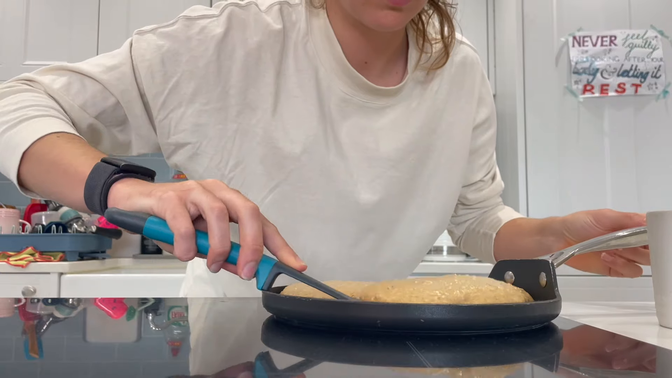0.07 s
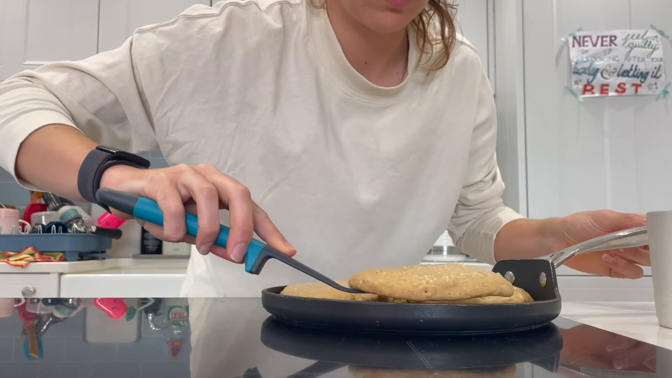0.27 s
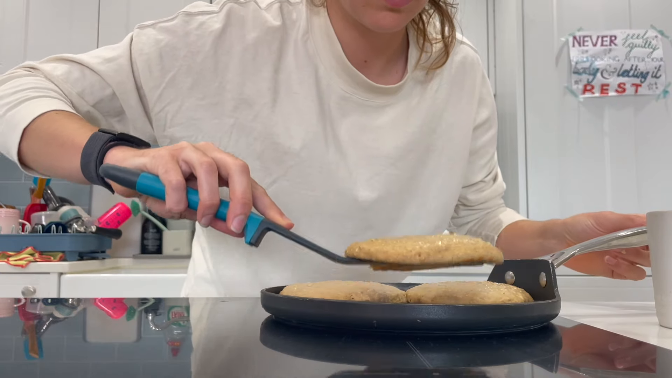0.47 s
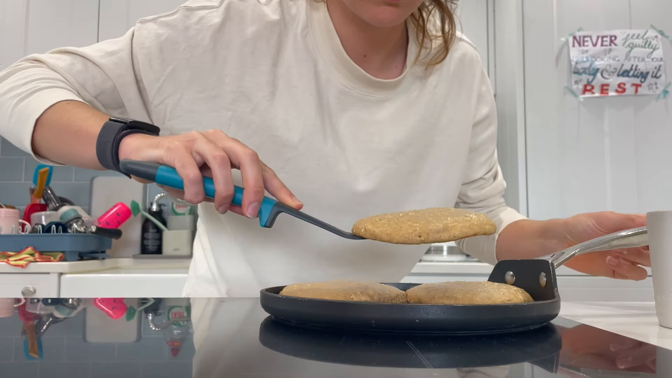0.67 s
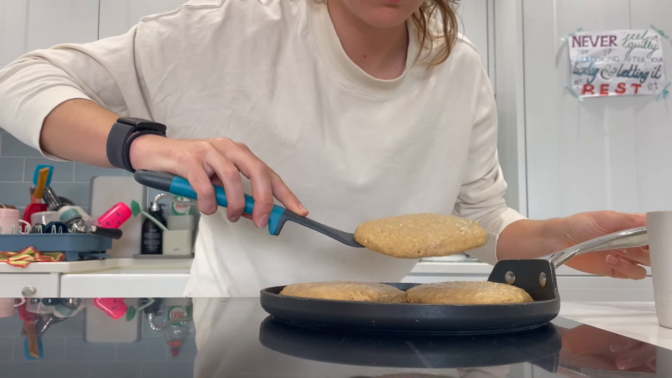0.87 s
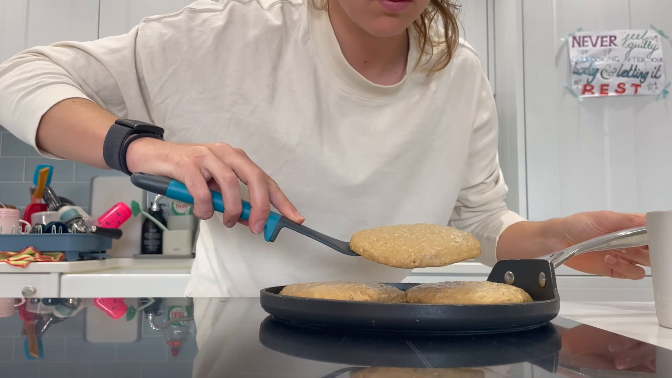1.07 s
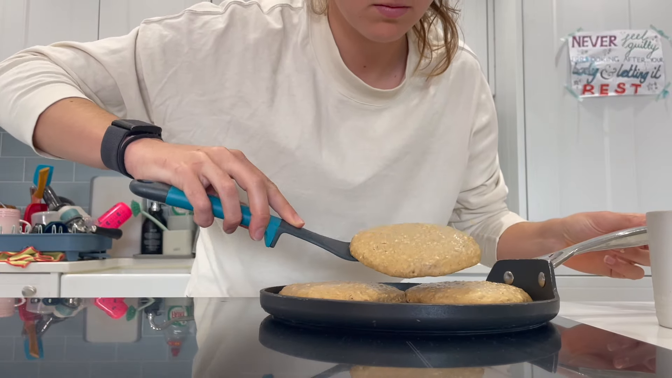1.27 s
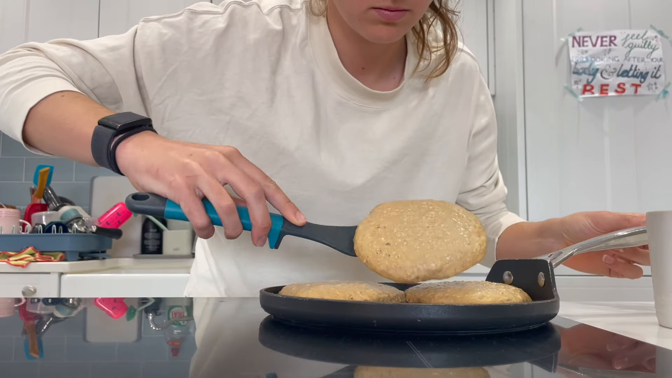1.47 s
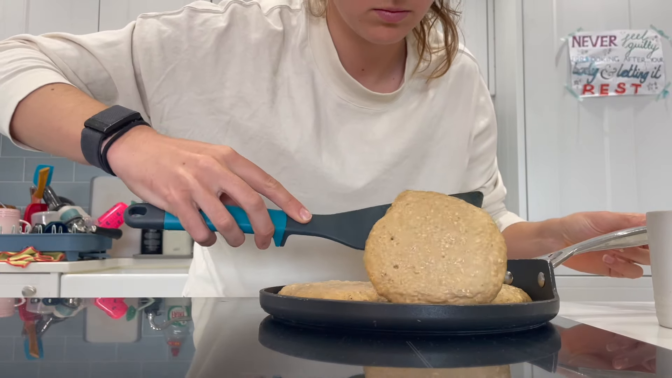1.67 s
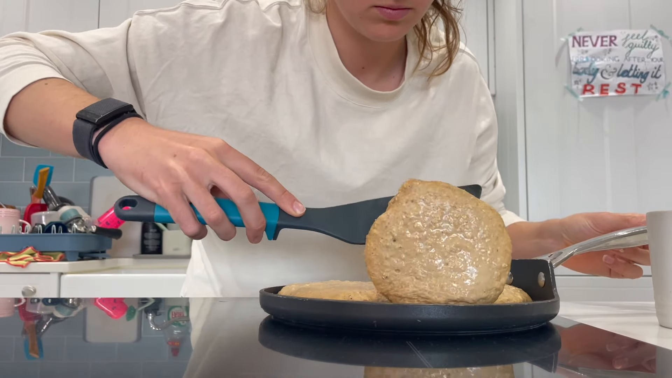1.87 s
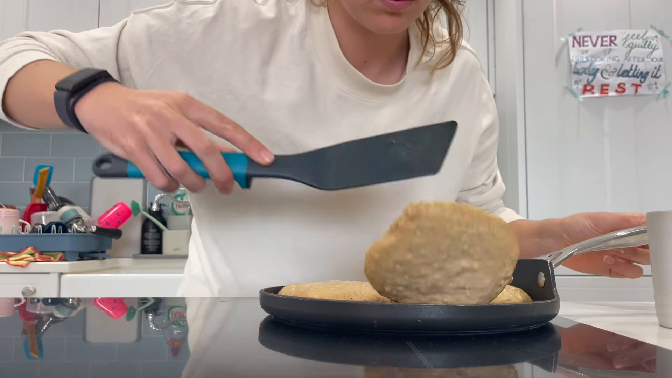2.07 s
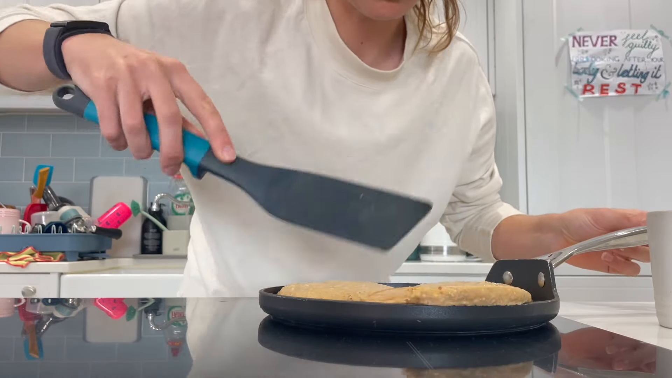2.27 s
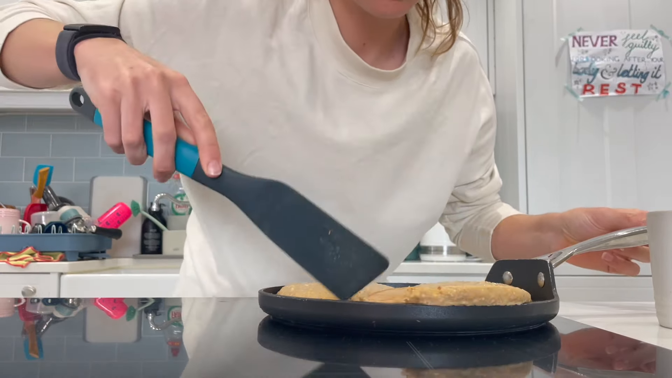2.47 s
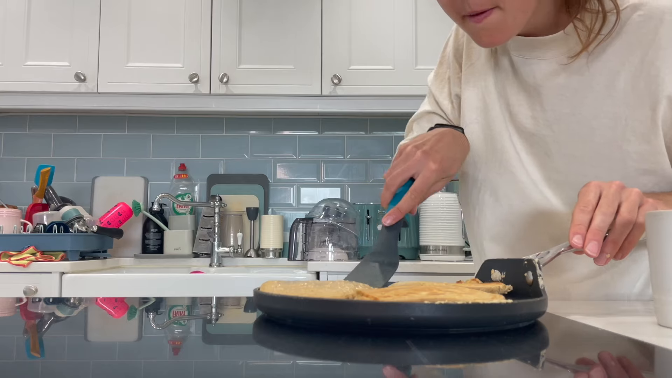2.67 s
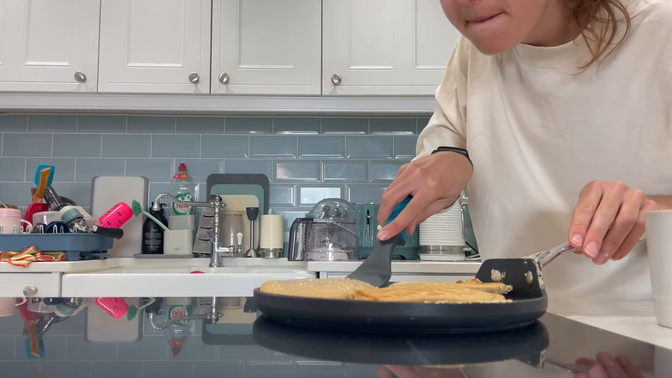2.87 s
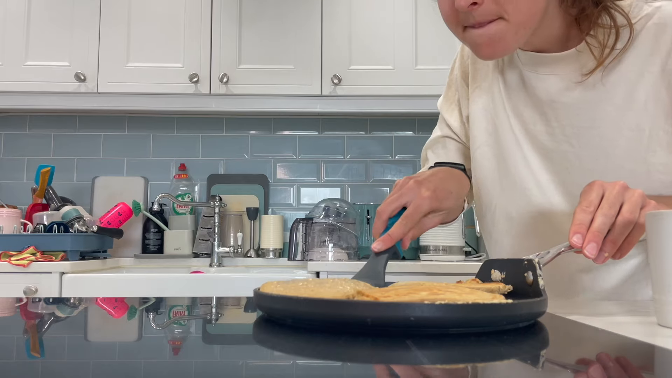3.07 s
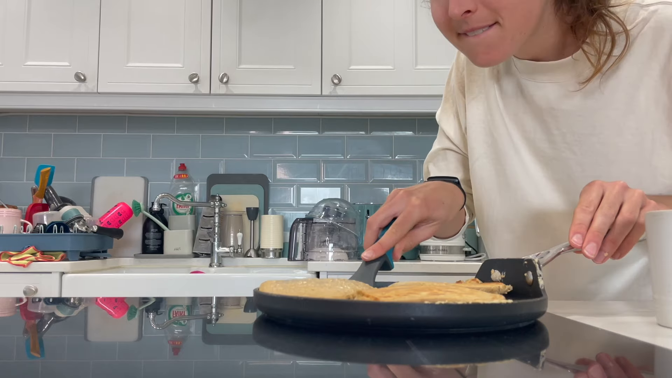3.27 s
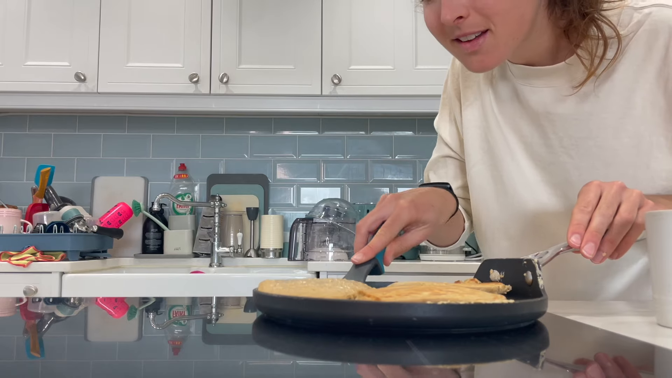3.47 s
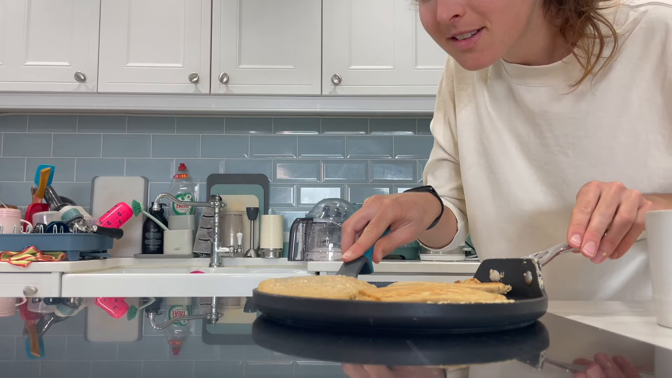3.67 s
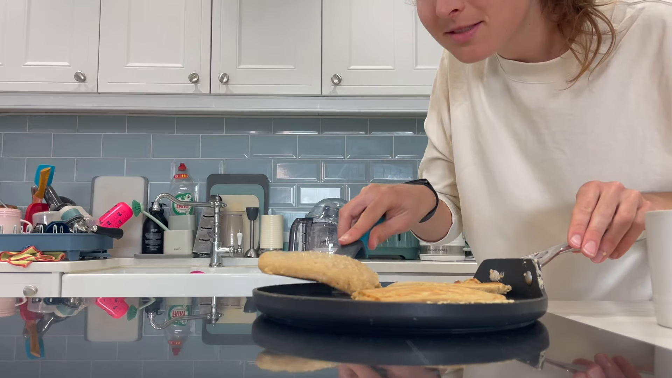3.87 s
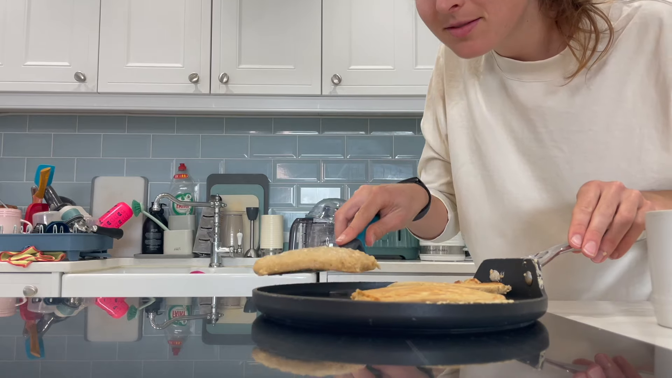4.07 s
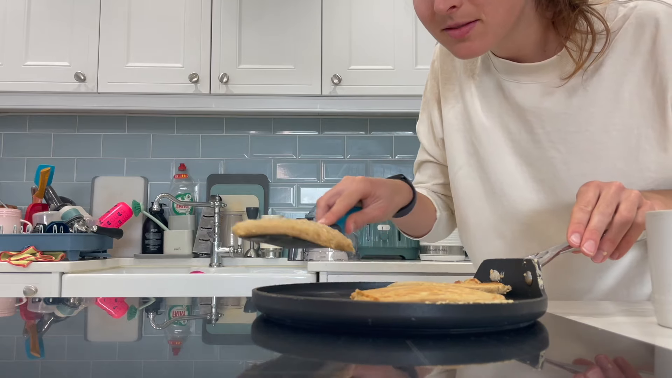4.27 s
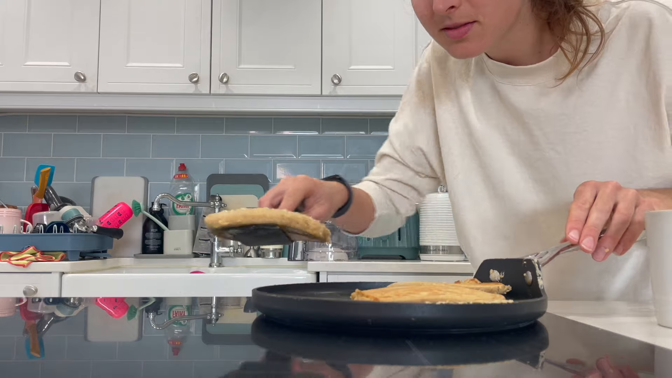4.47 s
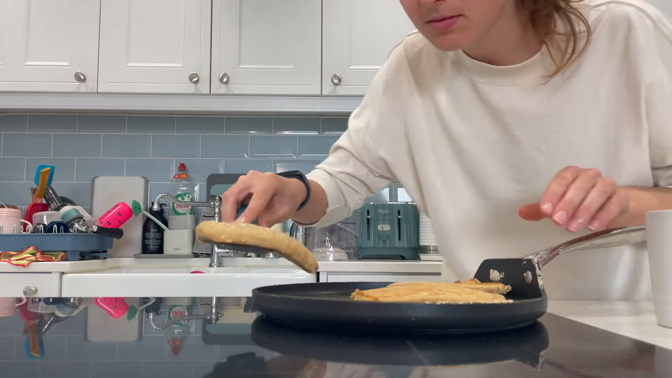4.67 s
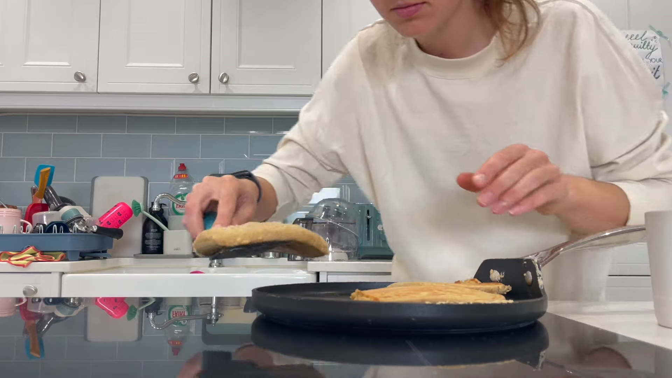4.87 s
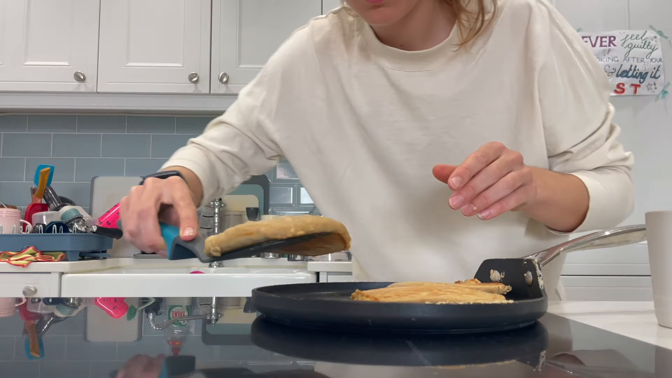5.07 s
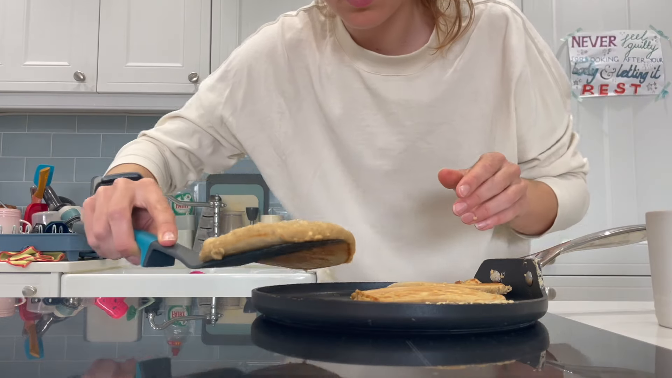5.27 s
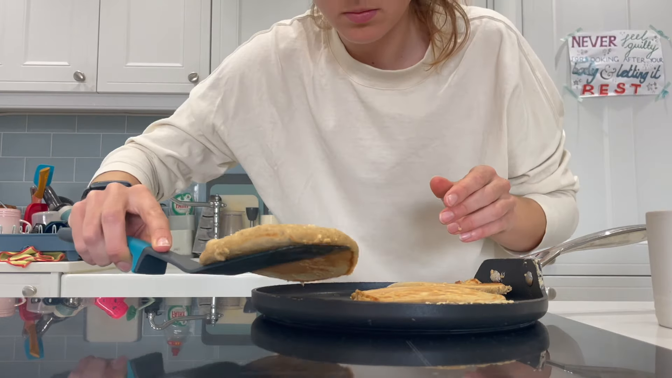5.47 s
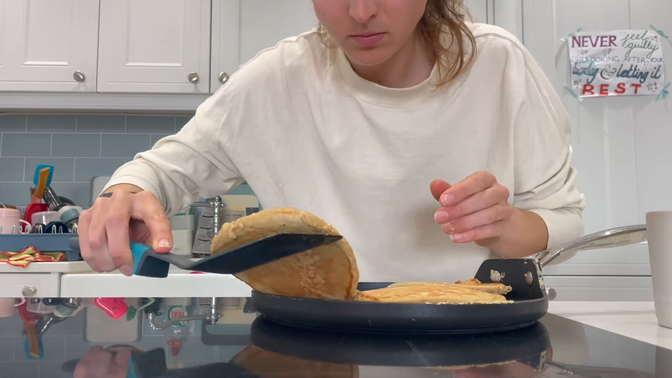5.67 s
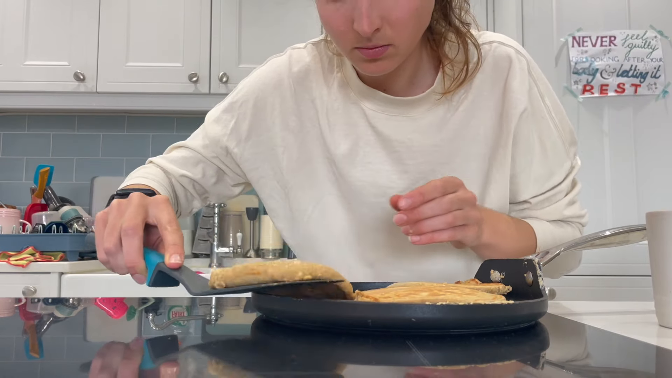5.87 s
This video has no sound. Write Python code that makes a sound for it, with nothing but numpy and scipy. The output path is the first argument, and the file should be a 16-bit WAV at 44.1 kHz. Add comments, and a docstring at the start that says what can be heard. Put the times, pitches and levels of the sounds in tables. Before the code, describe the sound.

Close stereo phone pickup beside a pan on a glass hob: mostly quiet motor hum and airy hiss, broken by brief gritty spatula strokes. A knock comes early, two loud hits around the flip, then a hard edit to further scraping, tiny clicks, a muffled cupboard thump with short room echo, and a last cluster of scrapes and taps. No talking.

```python
"""Two appliance motors hum a few hertz apart throughout, over whines, air and hiss, modelled as sines and
noise. A nylon spatula works pancakes loose in a coated pan on a glass hob: stick-slip grains rub, blows ring
the pan, blade and crust click, and weight shakes the counter under the phone. Near 2.1 s one pancake is flipped
and slaps down; at 2.5 s the blade knocks hard on the pan. At 2.574 s a splice joins another moment of the
cooking; more strokes follow, something bumps the cabinets at 4.68 s, a dull onset and fading noise; last
scrapes and knocks come near 5.8 s."""
import sys
import numpy as np
from scipy import signal
from scipy.fft import rfft, irfft
from scipy.io import wavfile

SR = 44100
rng = np.random.default_rng(int(sys.argv[2]) if len(sys.argv) > 2 else 0)


def bounce(signal):
    """Save signal as a 16-bit WAV file at the path given by the first command-line argument."""
    frames = np.transpose(np.atleast_2d(signal))
    limited = np.clip(frames, -1, 1)
    pcm = np.round(limited * 32767).astype(np.int16)
    wavfile.write(sys.argv[1], SR, pcm)


N = 260631
T = np.arange(N) / SR   # time axis, s

# Motor whines: f/Hz, relative level/dB
WHINES = [(1050, -83), (1120, -82), (2697, -89), (2896, -86), (2993, -85), (3192, -86), (3494, -84),
          (3591, -82)]
# Kitchen air, in phase in both channels: f/Hz, relative level per Hz/dB
KITCHEN_AIR = [(22, -9.5), (45, 8), (90, 4), (250, -3), (420, -6.5), (600, -19)]
# Kitchen air, opposed in the two channels: f/Hz, relative level per Hz/dB
DIFFUSE_AIR = [(100, 14), (300, 14.5), (700, 12), (1200, 5.5)]
# Top end of both kitchen airs: f/Hz, relative level per Hz/dB
NO_TREBLE = [(2200, -75)]
# Vent air: f/Hz, level per Hz/dB
VENT_AIR = [(300, -110), (500, -95), (800, -101), (1080, -98.5), (1400, -107), (1950, -111), (2900, -104.5),
            (3600, -106), (4200, -111)]
# Microphone hiss: f/Hz, level per Hz/dB
MIC_HISS = [(6000, -106.5), (8000, -105), (10000, -106), (12000, -109), (14000, -109), (15600, -105)]
# Rubbing strokes: t/s, rise/s, hold/s, fade per 20 dB/s (5 ms at least), rub level/dB,
# bright level against the rub/dB
STROKES = [(0.005, 0.018, .01, -0.14, -58, -7.5), (1.434, 0.068, 0.024, 0.16, -41, -2),
           (1.562, 0.054, 0.012, 0.16, -53, -10.5), (1.661, 0.037, .09, 0.08, -61, -9.5),
           (1.796, 0.022, 0.075, 1.27, -67.5, -5), (2.118, 0.019, 0.0066, 0.03, -36, -2.5),
           (2.193, .01, 0.065, -0.46, -58.5, -5), (2.566, .02, 0.12, 0.03, -55.5, 0),
           (2.65, 0.26, .08, 0.02, -48.5, -1.5), (3.031, 0.037, 0.019, 0.0358, -38.5, -12.5),
           (3.11, 0.015, 0.045, 0.2747, -51, -5.5), (3.253, 0.028, .1, 0.09, -61.5, -18.5),
           (3.359, 0.095, 0.026, 0.14, -52, -12.5), (3.705, 0.014, 0.068, 0.5, -61.5, -12),
           (3.83, 0.012, .005, -0.89, -54.5, -25), (4.579, 0.006, 0.0061, 1.43, -51.5, -11),
           (5.546, 0.021, 0.0054, -0.005, -39.5, 2), (5.602, 0.041, 0.087, 0.13, -44.5, -3.5),
           (5.782, 0.036, 0.011, -0.09, -39, -6.5), (5.86, 0.011, .05, .1, -59, -11)]
# Dull friction noise: f/Hz, relative level per Hz/dB
RUB_DULL = [(200, -77), (400, 6), (1000, 3.5), (1700, 0), (2300, -9), (3000, -3.5), (6000, -18)]
# Bright friction noise: f/Hz, relative level per Hz/dB
RUB_BRIGHT = [(1200, -7.5), (2500, -1), (3300, -2), (4500, -3.5), (5600, -3), (8000, -11.5), (10500, -50),
              (13000, -44)]
# Finest friction hiss: f/Hz, relative level per Hz/dB
SHEEN = [(6000, -9), (9000, 28), (12000, -27), (15600, 12)]
# Counter shaken by a stroke: f/Hz, relative level per Hz/dB
SHAKE = [(40, -12), (80, 9.5), (150, 6.5), (300, 0.5), (500, -21)]
# Ringing modes of the pan: f/Hz, relative level/dB, free t60/s
PAN_MODES = [(275, -9, .14), (342, -9, .1), (387, -1, .11), (423, -2, .11), (522, -3, .08), (576, 0, .15),
             (661, -4, .15), (712, -9, .1), (975, -3, .08), (1197, 0, .03), (1400, -3, .04),
             (1640, -1, .05), (1750, -5, .04), (1900, -10, .04), (2400, -12, .05), (3050, -10, .03),
             (3280, -10, .03), (3600, -16, .05), (4570, -18, .03), (5580, -16, .04)]
# Knocks on the pan, and the dull onset of the cabinet bump at 4.678 s:
# t/s, peak level/dB, contact cut-off f/Hz, damping (share of the free ring time)
BLOWS = [(.025, -54, 2020, 0.29), (1.511, -32.5, 2500, 0.3), (1.641, -48, 2500, 0.24),
         (1.758, -46, 2500, 0.22), (2.131, -38.5, 2480, 0.22), (2.135, -22, 2500, 0.35),
         (2.517, -13, 960, 0.57), (2.537, -30.5, 744, 0.45), (3.064, -33.5, 1520, 0.85),
         (3.079, -28.5, 1530, 0.7), (3.094, -32, 910, 0.22), (4.678, -27, 950, 0.11),
         (5.717, -33, 2500, 0.23), (5.811, -28.5, 2500, 0.44), (5.817, -32.5, 2520, 0.5),
         (5.838, -35.5, 1500, 0.31)]
# Clicks of blade and crust: t/s, level/dB, f/Hz, ring time constant/ms
TICKS = [(0.9525, -47, 8900, 0.59), (1.824, -45, 2190, 0.59), (2.125, -28.5, 2350, 0.71),
         (2.1304, -22, 2280, 1), (2.138, -14, 3220, 0.8), (2.516, -27.5, 3090, 4), (2.5173, -9, 1284, 2),
         (3.66, -47.5, 8760, 1.2), (3.7734, -47, 1280, 1.5), (3.7744, -35.5, 9030, 1.6),
         (3.8322, -43.5, 6250, 0.57), (3.84, -43, 6150, 0.86), (3.8412, -33, 1130, 0.78),
         (4.0026, -42.5, 5600, 0.43), (4.292, -45.5, 8600, 1.5), (4.5907, -36, 2470, 0.71),
         (5.868, -30.5, 1880, 1.2), (5.872, -25.5, 560, 2.6)]
# Soft weight on the counter: t/s, push level/dB, push length/s
THUDS = [(1.556, -35, 0.0094), (2.139, -24.5, 0.0053), (2.149, -18, 0.0048), (2.164, -20.5, 0.0064),
         (2.52, -30, 0.0033), (2.535, -30.5, 0.0051), (3.082, -32.5, 0.007), (5.882, -37.5, 0.0044)]
# Ringing modes of the counter: f/Hz, relative level/dB, t60/s
COUNTER_MODES = [(60.5, -12, 0.097), (77, 2, 0.19), (120, -5.5, 0.13), (148.8, 2.5, 0.26), (218, -30, 0.13),
                 (274, -4, 0.4), (320, -49, .15)]
# Low part of the cabinet bump: f/Hz, relative level per Hz/dB
BUMP_LOW = [(60, -18), (150, -3), (250, 0), (450, -3), (800, -13), (1300, -24), (3000, -55)]
# Treble part of the cabinet bump: f/Hz, relative level per Hz/dB
BUMP_TREBLE = [(600, -8), (1100, 0), (2300, -11), (4000, -19), (7000, -24), (10000, -40)]
# Two microphone ports: f/Hz, phase lead of left/rad, left minus right level/dB
PORTS = [(30, 0.016, 0.5), (208, 0.16, -2), (465, 0.59, -4), (955, 0.3, -.5), (1990, 0.28, 0),
         (2980, 1.48, -1.5), (3640, 0.54, -2.5), (5270, 0.64, 0), (6970, 1.28, 0)]
# Treble of the ports, near opposite phase: f/Hz, phase lead of left/rad, left minus right level/dB
PORTS_OPPOSED = [(9400, np.pi, 0), (13400, np.pi, 0), (14500, 3.4, 0), (15200, 3.8, 0), (15800, 4.4, 0)]

SPLICE_S, SPLICE_FADE_S = 2.574, 0.0075
# Two motors; at a beat top both tones add up: one moment before the splice, one after
HUM_HZ, HUM_RELATIVE_DB, BEAT_TOPS_S = (93.2, 99.8), (-57.5, -60.5), (0.771, 3.925)
KITCHEN_AIR_DB, DIFFUSE_AIR_DB = -52, -65.5
GRAINS_PER_S, GRAIN_SPREAD_DB = 2500, 2.5
PAN_SHARE_DB, PAN_BRIGHT_SHARE_DB = -5, -6   # pan ring against the direct rub
SHEEN_DB = -11.5   # against the bright part
RUB_UNLIKE = 0.076   # amount of noise opposed in the channels
SHAKE_DB, SHAKE_FOLLOWS = -54, 0.26   # for a stroke of -50 dB; share of the stroke's level it follows
ROOM_T60_S, ROOM_DB, ROOM_CUT_HZ, ROOM_UNLIKE = 0.4, -17, 1730, 0.2
LOW_MODES_LATE = 0.78   # cycles of its own pitch by which a mode starts late: slow bending waves
CLEAR_BELOW_HZ, TICK_HISS = 1970, 0.46   # low clicks ring clear, hiss grows to this amount above
BUMP_S, BUMP_DB, BUMP_T60_S = 4.679, -31, 0.48
BUMP_TREBLE_DB, BUMP_TREBLE_T60_S = -44, 0.3
LOW_CUT_HZ, HIGH_STOP_HZ = 54, 16200
OPPOSITE = np.array([[1], [-1]])   # one sound, inverted in the right channel


def from_db(db):
    """Turn decibels into gain."""
    return 10 ** (np.asarray(db) / 20)


def rms_one(x):
    """Scale to unit rms."""
    return x / np.sqrt(np.mean(x ** 2) + 1e-20)


def at_hz(points, column=1):
    """Read a table column at every bin of the spectrum, on a log frequency axis."""
    points = np.array(points)
    bins_hz = np.fft.rfftfreq(N, 1 / SR)
    return np.interp(np.log(bins_hz + 1), np.log(points[:, 0]), points[:, column])


def colour(x, spectrum):
    """Shape a noise with a spectrum, at unit rms."""
    return rms_one(irfft(rfft(x) * from_db(at_hz(spectrum)), N))


def drift(rate_hz):
    """Slow random wander of unit rms: noise through two equal low-pass poles."""
    r = np.exp(-2 * np.pi * rate_hz / SR)
    wander = signal.lfilter([1], [1, -2 * r, r * r], rng.standard_normal(N + SR))
    return rms_one(wander[SR:])   # drop the filter's start-up


def body(force, modes):
    """A force rings every mode; a unit click gives a decaying sine of the mode's height."""
    out = 0
    for hz, level_db, t60 in modes:
        r = from_db(-60 / (t60 * SR))
        w = 2 * np.pi * hz / SR
        push = [0, from_db(level_db) * np.sin(w)]
        resonance = [1, -2 * r * np.cos(w), r * r]
        out = out + signal.lfilter(push, resonance, force + 1e-18)   # offset keeps the filter from underflow
    return out


def add(out, s, sound):
    """Place a sound in the track before or after the splice."""
    at = round(s * SR)
    sound = sound[:N - at]
    out[int(s > SPLICE_S), at:at + len(sound)] += sound


def appliances():
    """Two close tones beat; thin unsteady whines ride on broad air and hiss."""
    since_top = T - np.where(T < SPLICE_S, *BEAT_TOPS_S)
    hum = 0
    for hz, db in zip(HUM_HZ, HUM_RELATIVE_DB):
        hum = hum + from_db(db + 4.5 + 0.6 * drift(10)) * np.sin(2 * np.pi * hz * since_top)
    waver = np.cumsum(drift(8)) * 0.00019 / SR   # speed wanders by a few parts in ten thousand
    whine = sum(from_db(db + 5) * np.sin(2 * np.pi * hz * (T + waver)) for hz, db in WHINES)
    air = colour(rng.standard_normal(N), KITCHEN_AIR + NO_TREBLE)
    air = from_db(KITCHEN_AIR_DB + 0.33 * drift(16)) * air
    diffuse = from_db(DIFFUSE_AIR_DB) * colour(rng.standard_normal(N), DIFFUSE_AIR + NO_TREBLE)
    hiss = irfft(rfft(rng.standard_normal(N)) * from_db(at_hz(VENT_AIR + MIC_HISS)), N)
    hiss = hiss * np.sqrt(SR / 2) * from_db(0.62 * drift(3.2))   # root of the bandwidth: level per Hz
    return hum + whine + air + hiss + diffuse * OPPOSITE


def stroke(start, rise, hold, fade):
    """Pressure swells, holds, then dies away exponentially."""
    since = T - start
    swell = np.clip(since / max(rise, 0.002), 0, 1) ** 0.94
    return swell * from_db(-20 * np.maximum(since - rise - hold, 0) / max(fade, 0.005))


def rubbing():
    """Dense stick-slip grains excite the pan and hiss directly; pressure also shakes the counter."""
    gains = np.zeros((3, N))
    for start, rise, hold, fade, rub_db, bright_db in STROKES:
        shake_db = SHAKE_DB + SHAKE_FOLLOWS * (rub_db + 50)
        levels = from_db([[rub_db], [rub_db + bright_db], [shake_db]])
        gains += stroke(start, rise, hold, fade) * levels
    dull_gain, bright_gain, shake_gain = gains

    sizes_db = GRAIN_SPREAD_DB * np.minimum(rng.exponential(1, N), 4)
    sizes = from_db(sizes_db) * rng.choice([-1, 1], N)
    grains = sizes * (rng.random(N) < GRAINS_PER_S / SR)
    pan_ring = rms_one(body(grains, PAN_MODES))
    dull = rms_one(colour(grains, RUB_DULL) + from_db(PAN_SHARE_DB) * pan_ring)

    unlike = RUB_UNLIKE * rng.standard_normal(N) * OPPOSITE
    fine = 0.58 * rms_one(grains) + rng.standard_normal(N) + unlike
    upper_modes = [mode for mode in PAN_MODES if mode[0] > 2000]
    upper_ring = rms_one(body(fine, upper_modes))
    bright = rms_one(colour(fine, RUB_BRIGHT) + from_db(PAN_BRIGHT_SHARE_DB) * upper_ring)
    hiss = bright + from_db(SHEEN_DB) * colour(fine, SHEEN)

    shake = colour(rng.standard_normal(N), SHAKE)
    dull_part = from_db(1.5 * drift(25)) * dull_gain * dull
    hiss_part = from_db(0.69 * drift(42)) * bright_gain * hiss
    return dull_part + hiss_part + shake_gain * shake


def room(x):
    """Decaying dull noise as the echo pattern, partly different in each channel."""
    t = T[:SR // 2]
    decay = from_db(-60 * t / ROOM_T60_S) * np.clip(t / 0.003, 0, 1)
    common, own = rng.standard_normal((2, len(t))) * decay
    dull = signal.butter(2, ROOM_CUT_HZ, fs=SR, output="sos")
    echoes = signal.sosfilt(dull, [common + ROOM_UNLIKE * own, common - ROOM_UNLIKE * own])
    echoes = echoes / np.sqrt(np.sum(echoes ** 2) / 2)
    return x + from_db(ROOM_DB) * signal.fftconvolve(x, echoes, axes=1)[:, :N]


def blows():
    """A click softened by the contact excites modes of random strength, low ones later; also the bump's onset."""
    out = np.zeros((2, N))
    click = np.eye(1, SR // 3)[0]
    strengths_db = rng.normal(0, 1.5, (len(BLOWS), len(PAN_MODES)))
    for (s, peak_db, cut_hz, damping), own_db in zip(BLOWS, strengths_db):
        contact = signal.butter(2, cut_hz, fs=SR, output="sos")
        force = signal.sosfilt(contact, click)
        ring = np.zeros(len(click))
        # the bump's onset borrows the pan's modes, heavily damped
        for k, (hz, db, t60) in enumerate(PAN_MODES):
            late = round(LOW_MODES_LATE * SR / hz)
            mode_ring = body(force, [(hz, db + own_db[k], t60 * damping)])
            ring[late:] += (-1) ** k * mode_ring[:len(ring) - late]   # neighbours alternate in sign
        add(out, s, from_db(peak_db) * ring / np.abs(ring).max())
    return out


def ticks():
    """Blade and crust click: a short ring at its own pitch, with a spit of hiss on the higher ones."""
    out = np.zeros((2, N))
    t = T[:900]
    noises = rng.standard_normal((len(TICKS), len(t)))
    for (s, level_db, hz, ring_ms), noise in zip(TICKS, noises):
        hiss = TICK_HISS * np.clip(hz / CLEAR_BELOW_HZ - 1, 0, 1)
        wave = np.sin(2 * np.pi * hz * t) + hiss * np.diff(noise, prepend=0)
        add(out, s, from_db(level_db) * wave * np.exp(-1000 * t / ring_ms))
    return out


def thuds():
    """Soft weight gives a smooth push into the low modes of the counter."""
    force = np.zeros((2, N))
    for s, level_db, length in THUDS:
        push = np.sin(np.pi * np.clip(T[:2000] / length, 0, 1)) ** 2
        add(force, s, from_db(level_db) * push / push.sum())
    return body(force, COUNTER_MODES)


def bump_echoes():
    """The cabinet bump rolls round the kitchen: blurred echoes as noise, the treble dying faster."""
    since = np.maximum(T - BUMP_S, 0)
    low_gain = from_db(BUMP_DB - 60 * since / BUMP_T60_S)
    treble_gain = from_db(BUMP_TREBLE_DB - 60 * since / BUMP_TREBLE_T60_S)
    low = low_gain * colour(rng.standard_normal(N), BUMP_LOW)
    treble = treble_gain * colour(rng.standard_normal(N), BUMP_TREBLE)
    return np.clip(since / 0.0015, 0, 1) * (low + treble)


def scene():
    """Pan sounds and their tails fade at the splice; thuds reach the phone by the counter, without echoes."""
    before, after = blows() + ticks()
    thud_before, thud_after = thuds()
    rub = rubbing()
    fade = np.clip((SPLICE_S - T) / SPLICE_FADE_S, 0, 1)
    first = room(before + rub * (T < SPLICE_S)) + thud_before
    second = room(after + rub * (T >= SPLICE_S)) + thud_after
    return fade * first + second + bump_echoes() + appliances()


def record(dry):
    """Ports shift phase and level between channels, near opposite in the treble; lows and top are cut."""
    response = PORTS + PORTS_OPPOSED
    half = np.exp(0.5j * at_hz(response)) * from_db(at_hz(response, column=2) / 2)
    ports = irfft(rfft(dry) * [half, 1 / half], N)
    low_cut = signal.butter(2, LOW_CUT_HZ, "high", fs=SR, output="sos")
    top_cut = signal.cheby2(16, 70, HIGH_STOP_HZ, fs=SR, output="sos")
    return signal.sosfilt(top_cut, signal.sosfilt(low_cut, ports))


dry = scene()
out = record(dry)
bounce(out)
```